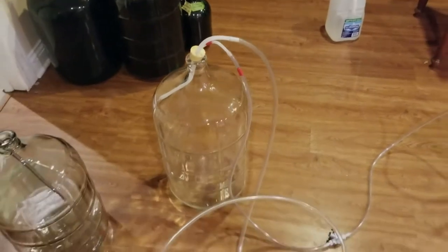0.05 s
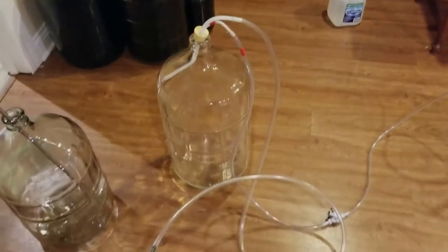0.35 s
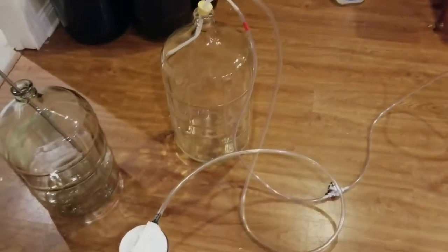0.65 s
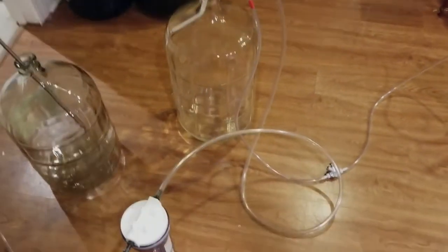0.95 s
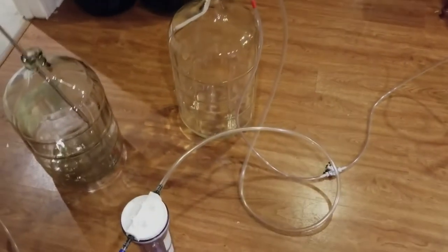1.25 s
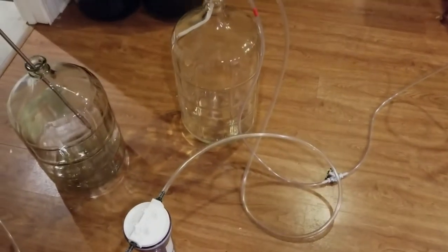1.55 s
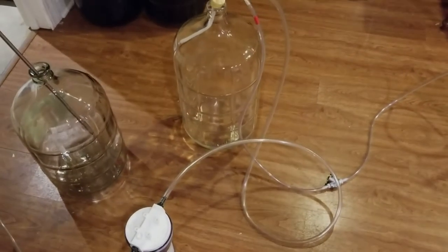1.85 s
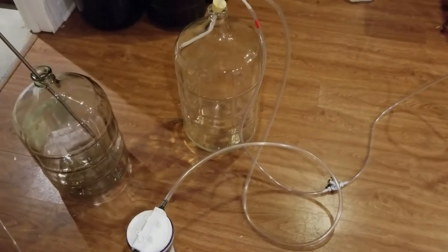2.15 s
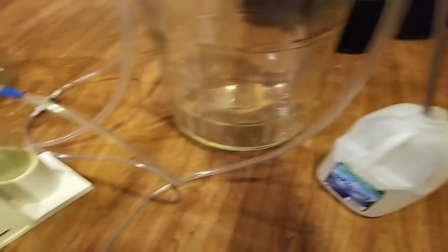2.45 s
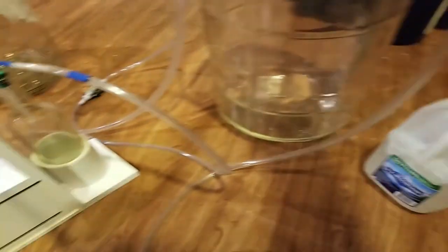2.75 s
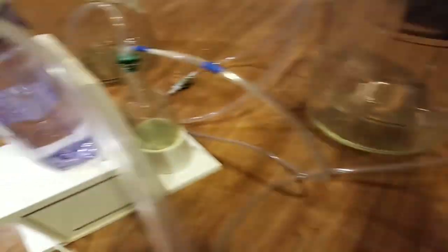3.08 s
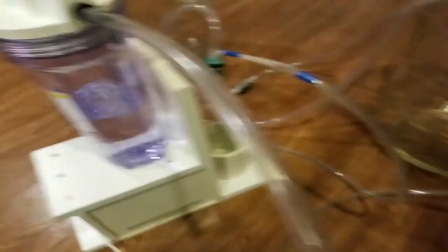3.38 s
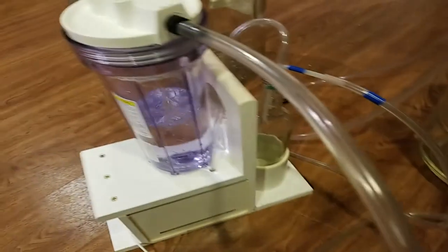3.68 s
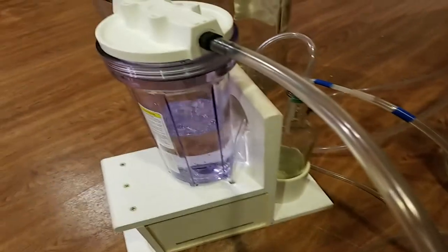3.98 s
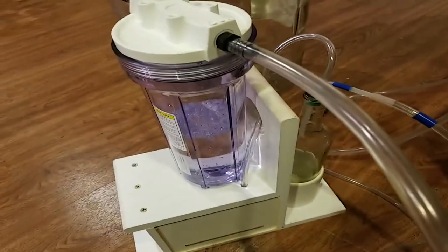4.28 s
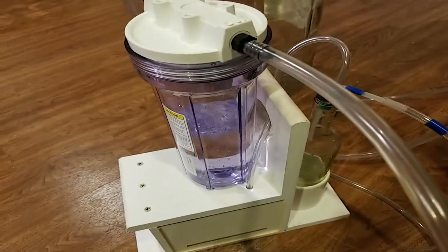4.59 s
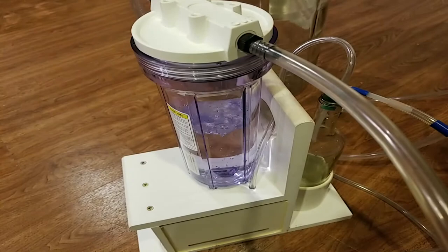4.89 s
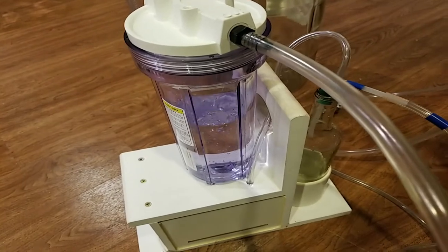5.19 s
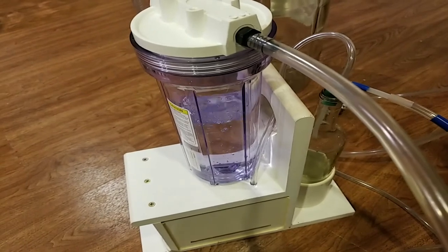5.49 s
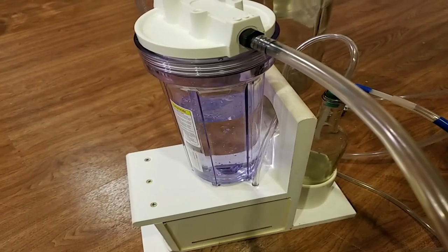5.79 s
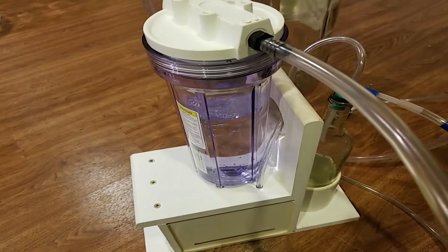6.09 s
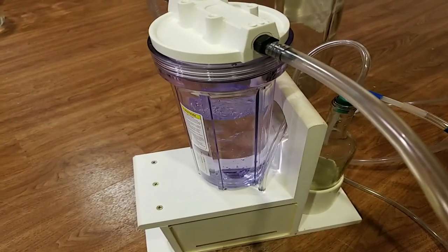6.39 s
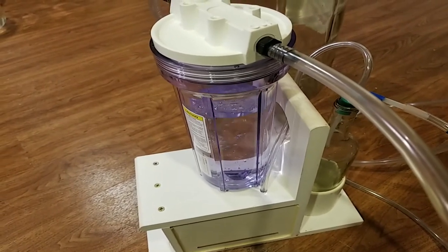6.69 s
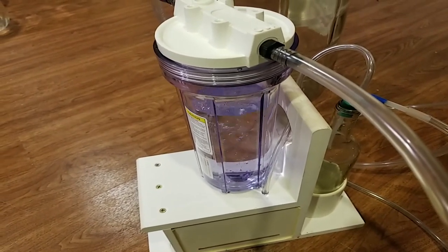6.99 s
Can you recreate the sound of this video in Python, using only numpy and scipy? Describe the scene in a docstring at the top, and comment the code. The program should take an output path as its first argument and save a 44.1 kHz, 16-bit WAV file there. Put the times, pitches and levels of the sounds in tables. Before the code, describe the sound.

Light clicks, pops and brief rustles come from fingers handling the microphone indoors, first on the left, then on the right. An abrupt cut brings in a much louder small vacuum pump, already running. It drones at an even speed with a fast buzzing knock, airy valve rattle and a thin high ring. The microphone nears it, and the sound settles, a little to the left.

```python
"""In a quiet room with a faint appliance hum, a hand shifts on a hand-held camera, and fingers tap
and slide over its two microphone ports. A short silence cuts to a second scene: a small diaphragm
vacuum pump at full speed. Each turn of its shaft knocks the body, spurts air through the rattling
valves and snaps a reed. The camera moves up to the pump, so the tone colour shifts and then settles;
later the hand shifts once more."""
import sys
import numpy as np
from scipy import signal
from scipy.fft import rfft, irfft, next_fast_len
from scipy.io import wavfile
from scipy.ndimage import map_coordinates

SR = 44100
rng = np.random.default_rng(int(sys.argv[2]) if len(sys.argv) > 2 else 0)


def file_out(sig):
    """Save sig as 16-bit WAV at sys.argv[1]."""
    # one column per channel
    cols = np.atleast_2d(sig).T
    # limit, then scale
    lim = np.clip(cols, -1, 1)
    pcm = np.round(lim * 32767).astype(np.int16)
    wavfile.write(sys.argv[1], SR, pcm)


N = 314874
TIME = np.arange(N) / SR
PAUSE_S, PUMP_S = 2.18, 2.2455  # the silence between the two scenes
TOP_HZ = 15850
PORT_PAN_DB = {"left": 24.5, "right": -22}  # a finger on one port is heard mostly on that side

# the pump's shaft speed: time_s, speed_hz
SHAFT_SPEED = [(2.25, 52.93), (2.8, 52.87), (3.25, 52.78), (5.5, 52.84), (5.8, 52.99), (6.0, 52.85),
               (7.14, 52.9)]
# air flow through the valves over one turn: place_in_turn (0-1), level_db
VALVE_FLOW = [(0, -4), (.08, -0.5), (.2, -5.5), (.4, -10.5), (.62, -5), (.76, -1.5), (.92, -4.5), (1, 6)]


def amp(db):
    """Decibels to gain."""
    return 10 ** (np.asarray(db) / 20)


def unit(x):
    """Scale to rms 1."""
    return x / np.sqrt(np.mean(x ** 2) + 1e-20)


def along(points, hz):
    """Read (freq_hz, value) points on a log axis."""
    freqs, values = np.transpose(points)
    return np.interp(np.log(hz + 1), np.log(freqs + 1), values)


def wobble(rate):
    """A smooth random curve, rate knots a second."""
    return map_coordinates(rng.standard_normal(int(N * rate / SR) + 4), [TIME * rate])


def filtered(x, response):
    """Filter x by a complex response of frequency."""
    size = next_fast_len(N + SR // 4)
    return irfft(rfft(x, size) * response(np.fft.rfftfreq(size, 1 / SR)), size)[..., :N]


def coloured(x, spectrum):
    """Shape x with a (freq_hz, gain_db) curve, at rms 1."""
    return unit(filtered(x, lambda hz: amp(along(spectrum, hz))))


def resonance(hz, centre_hz, width_hz):
    """Causal response of one mode."""
    return 1j * hz * width_hz / (centre_hz ** 2 - hz ** 2 + 1j * hz * width_hz)


def panned(pan_db):
    """Left and right gains whose mean is 1; positive is left."""
    ratio = amp(np.atleast_1d(pan_db))
    return 2 * np.array([ratio, np.ones_like(ratio)]) / (1 + ratio)


def each_turn(cycle, turn):
    """Play a stereo cycle once for every turn of the shaft."""
    size = cycle.shape[1]
    place = (turn % 1) * size
    index = place.astype(int)
    return cycle[:, index % size] * (index + 1 - place) + cycle[:, (index + 1) % size] * (place - index)


def room(apart_hz=1500):
    """Still air, alike at both ports in the bass; an appliance hums faintly during the first scene."""
    # room tone: freq_hz, gain_db
    air_colour = [(25, -5), (50, -0.5), (85, 4), (130, 4), (200, -13.5), (400, -17), (800, -23),
                  (2500, -25), (8000, -30.5), (15500, -27)]
    # the appliance's partials: pitch_hz, level_db
    partials = [(77, -67.5), (120, -72.5), (243, -81.5)]
    mid, side = coloured(rng.standard_normal((2, N)), air_colour)
    side = filtered(side, lambda hz: hz / (hz + apart_hz))
    hum = 0
    for hz, db in partials:
        level = np.sqrt(2) * amp(db + 1.5 * wobble(3.6))
        hum += level * np.sin(2 * np.pi * hz * TIME + .5 * wobble(5.45))
    return amp(-67.5) * np.array([mid + side, mid - side]) + hum * (TIME < PAUSE_S)


def shuffles():
    """The hand shifts its grip and the case rumbles briefly, through one broad resonance."""
    # shifts of the grip: centre_s, half_length_s, pitch_hz, level_db, pan_db
    grips = [(0.153, .13, 340, -65.5, 9), (0.334, 0.041, 188, -48, 23), (0.338, 0.048, 420, -54.5, 22),
             (0.728, 0.026, 420, -58.5, 21), (0.86, 0.11, 234, -64.5, 9), (2.074, 0.018, 735, -72, -20),
             (5.364, 0.074, 97, -50, 4)]
    out, noise = 0, rng.standard_normal(N)
    for centre_s, half_s, pitch_hz, db, pan_db in grips:
        rumble = unit(filtered(noise, lambda hz: resonance(hz, pitch_hz, .5 * pitch_hz) ** 2))
        out += panned(pan_db) * amp(db) * np.exp(-((TIME - centre_s) / half_s) ** 2) * rumble
    return out


def taps(thump_hz=135, thump_t60=0.022, pop_cycles=2.6, click_t60=0.0045, case_t60=0.043,
         port_hz=1950, port_t60=0.0033, dull_hz=750, bright_hz=8000, leak_hz=70):
    """A finger pushes air into a port: a click that rings it, a pop, a thump, a shiver of the case."""
    # finger contacts: start_s, level_db, thump_trim_db, click_trim_db, finger_part, port
    contacts = [(.292, -38, 3, -30, "pad", "left"), (.333, -40.5, 4, -22, "pad", "left"),
                (.458, -33.5, -20, -17.5, "pad", "left"), (.602, -38.5, -26, -30, "pad", "left"),
                (.762, -37, -6, -11, "pad", "right"), (.768, -23, -19, -17, "pad", "right"),
                (.826, -47, -7, -8.5, "pad", "right"), (.857, -45, -7, -19.5, "pad", "right"),
                (1.053, -44.5, -14, -15, "tip", "left"), (1.111, -28, -15, -12.5, "tip", "right"),
                (1.152, -33.5, -15, -11.5, "nail", "right"), (1.177, -44, -3, -20, "pad", "right"),
                (1.408, -39.5, -15, -34, "tip", "right"), (1.571, -42, -15, -28, "tip", "right"),
                (1.680, -34.5, -24, -32, "tip", "right"), (1.692, -31, -22, -34, "tip", "right"),
                (1.791, -49.5, -10, -36, "tip", "right"), (1.897, -35, -21, -41, "tip", "right"),
                (2.036, -35, -23, -46, "tip", "right"), (2.104, -57.5, 5.5, -30, "pad", "right")]
    pop_pitch_hz = {"pad": 300, "tip": 655, "nail": 1610}
    out, t = np.zeros((2, N)), np.arange(SR // 8) / SR
    for start_s, db, thump_db, click_db, part, port in contacts:
        pop_hz = pop_pitch_hz[part]
        pop = amp(1 - 60 * t * pop_hz / pop_cycles) * np.sin(2 * np.pi * pop_hz * t)
        thump = amp(9 + thump_db - 60 * t / thump_t60) * np.sin(2 * np.pi * thump_hz * t)
        # a hard contact brightens the click; a soft one rounds off the pop
        hardness = np.interp(click_db, [-38, -14], [0, 1])
        edge_hz = min(dull_hz * (bright_hz / dull_hz) ** hardness, TOP_HZ)
        pop = signal.lfilter(*signal.butter(1, min(2 * edge_hz, TOP_HZ), fs=SR), pop)
        grit = signal.lfilter(*signal.butter(2, edge_hz, fs=SR), rng.standard_normal(len(t)))
        click = amp(10 + click_db - 60 * t / click_t60) * unit(grit)
        ring = hardness * amp(14 + click_db - 60 * t / port_t60) * np.sin(2 * np.pi * port_hz * t)
        case = signal.lfilter(*signal.butter(2, [500, 1500], "band", fs=SR), rng.standard_normal(len(t)))
        shiver = amp(-24 - 60 * t / case_t60) * unit(case)
        tap = amp(db) * (pop + thump + click + ring + shiver)
        out[:, round(start_s * SR):][:, :len(t)] += panned(PORT_PAN_DB[port]) * tap
    # the port leaks, so the slowest pressure is lost
    return signal.lfilter(*signal.butter(2, leak_hz, "high", fs=SR), out)


def strokes(grain_db=1.2, attack_s=0.03, release_s=0.039, fizz_arch_db=4):
    """Skin slides in fine, uneven slips over one port; it fizzes most mid-stroke, where it is fastest."""
    # finger slides: start_s, length_s, level_db, pressure_change_db, fizz_re_rub_db, rub_kind
    slides = [(0.331, 0.055, -51.5, -2.5, -8, "swipe"), (0.472, .170, -56.5, -3.5, 0.5, "left"),
              (0.686, 0.051, -64, -3, -20, "left"), (0.846, 0.021, -68, -2, -2, "right"),
              (1.116, 0.063, -66, 4, 2, "right"), (1.183, 0.14, -54.5, 3, -10.5, "right"),
              (1.438, 0.037, -54, -0.5, -19.5, "right"), (1.603, 0.06, -56.5, -1.5, -30, "right")]
    # skin in a quick swipe, on the left port, on the right port, and its fizz: freq_hz, gain_db
    swipe_colour = [(100, -8), (300, 16.5), (600, 3), (1100, -4), (2200, -4), (3200, -1), (4600, 0.5),
                    (6300, -6.5), (9000, -20)]
    left_colour = [(100, 9.5), (300, 10), (600, 4), (1100, 5), (2200, 3), (3200, -1), (4800, -1),
                   (6500, -15), (9000, -22)]
    right_colour = [(100, 3), (400, -1.5), (700, 5.5), (1150, -1), (1700, -0.5), (2200, -5), (2800, 3),
                    (3600, -1.5), (4600, -12), (6500, -14), (9000, -46)]
    fizz_colour = [(4000, -12), (6500, 0), (8500, -5), (11000, -1), (14000, -3), (16000, 1)]
    slips = amp(grain_db * wobble(700)) * rng.standard_normal((2, N))
    fizz = coloured(slips, fizz_colour)
    rubs = {"swipe": (coloured(slips, swipe_colour), "left"),
            "left": (coloured(slips, left_colour), "left"),
            "right": (coloured(slips, right_colour), "right")}
    out = 0
    for start, length, db, pressure_db, fizz_db, kind in slides:
        rub, port = rubs[kind]
        progress = np.clip((TIME - start) / length, 0, 1)
        fade_in_db = 20 * np.maximum(start - TIME, 0) / attack_s
        fade_out_db = 20 * np.maximum(TIME - start - length, 0) / release_s
        level = amp(db + pressure_db * (progress - .5) - fade_in_db - fade_out_db)
        fizz_share = amp(fizz_db + fizz_arch_db * (np.sin(np.pi * progress) - 1))
        out += panned(PORT_PAN_DB[port]) * level * (rub + fizz_share * fizz)
    return out


def pump_body(turn, near, levels_db, far_scatter=0.6, near_scatter=0.34, motor_order=4):
    """Each turn's blows ring the body; reflections scatter the harmonics' phases, more so from afar."""
    # the shaft's harmonics from afar and close by: order, relative_db
    far_harmonics = [(1, -11), (2, -9.5), (3, -7.5), (4, 2), (5, -7), (6, -7.5), (7, -13.5), (8, -2),
                     (9, -10.5), (10, -14), (11, -8), (12, -22), (13, -23), (14, -21), (15, -32), (16, -17),
                     (17, -28), (18, -12), (19, -9.5), (20, -13.5), (21, -2.5), (22, -7.5), (23, -6),
                     (24, -7.5), (25, -27), (26, -6), (27, -21), (28, -23), (29, -4), (30, -4.5), (31, -6),
                     (32, -11.5), (33, -38), (34, -7.5), (35, -17), (36, -26)]
    near_harmonics = [(1, -11), (2, -8.5), (3, -7.5), (4, 1), (5, -6), (6, -15.5), (7, -36), (8, -5.5),
                      (9, 0.5), (10, -4.5), (11, -7), (12, -16), (13, -28.5), (14, -26.5), (15, -25.5),
                      (16, -33), (17, -14.5), (18, -17), (19, -9), (20, -34), (21, -10), (22, -27),
                      (23, -10.5), (24, -11.5), (25, -11.5), (26, -15), (27, -3.5), (28, -7.5), (29, -4),
                      (30, -5.5), (31, -6.5), (32, -4.5), (33, -9), (34, -9), (35, -16), (36, -16)]
    # blows that set the harmonics' phases: place_in_turn (0-1), pitch_hz, width_hz, weight_db
    blows = [(0.05, 1670, 430, 9), (.69, 554, 38, 3.5), (.72, 235, 280, 6), (.05, 1060, 66, -2.5)]
    order = np.transpose(far_harmonics)[0]
    hz = order * np.mean(np.transpose(SHAFT_SPEED)[1])
    response = sum(amp(db) * resonance(hz, pitch, width) * np.exp(-2j * np.pi * order * place)
                   for place, pitch, width, db in blows)
    stray = rng.standard_normal(len(hz))
    # the motor's own hum is out of step with the blows and fills the gaps between them
    motor_lag = np.pi / 2 * (order == motor_order)
    # the shorter the wave, the more it differs between the two ports
    apart = 0.49 * np.minimum(np.sqrt(hz / 1500), 1) * rng.choice([-1, 1], size=len(hz))
    cycle = 2 * np.pi * order[:, None] * np.linspace(0, 1, 2048, endpoint=False)
    band_of = np.digitize(hz, [800, 1350])  # low drone, chamber buzz, knock
    gains = [amp(db + 0.08 * wobble(25)) for db in levels_db]
    chamber = np.abs(resonance(hz, centre_hz=1135, width_hz=110)) ** 2
    swell = amp(beam(centre_s=3.1, half_s=.45, db=8)) - 1
    out = 0
    # the room's colour gives way to the pump's own as the camera nears
    views = (far_harmonics, 1 - near, far_scatter), (near_harmonics, near, near_scatter)
    for harmonics, share, scatter in views:
        phase = np.angle(response) + scatter * stray - motor_lag
        port_phases = np.array([phase + apart, phase - apart])
        waves = np.cos(cycle + port_phases[..., None]) / np.cos(apart)[:, None]
        for band, gain in enumerate(gains):
            sizes = (band_of == band) * amp(np.transpose(harmonics)[1])
            sizes /= np.sqrt(np.sum(sizes ** 2) / 2)
            sound = each_turn(sizes @ waves, turn)
            if band == 1:  # in its beam, the buzz swells around the chamber's resonance
                sound += swell * each_turn((chamber * sizes) @ waves, turn)
            out += share * gain * sound
    return out


def valves(turn, near, level_db, air_db=3, rattle_db=-1):
    """Air spurts through the valves twice a turn; their rattle repeats and rings the housing."""
    # turbulent air and valve rattle: freq_hz, gain_db
    hiss_colour = [(25, -20), (130, 7), (330, 5.5), (500, 13), (750, -2), (1000, 11), (1650, 11.5),
                   (2000, -1.5), (3600, 3), (4300, -2.5), (6300, -4.5), (9000, -6.5), (11500, -7.5),
                   (14500, -26.5)]
    rattle_colour = [(1700, -54), (1950, 3), (2300, 6), (2700, -0.5), (3100, -1), (3550, 3), (4200, -10.5),
                     (5200, 1), (6200, -5.5), (7000, -7), (9000, -37), (13000, -9), (16000, -8.5)]
    # modes of the housing: pitch_hz, width_hz, far_db, near_db
    housing_modes = [(2130, 340, -73, -56.5), (2650, 170, -81, -63), (3550, 260, -61, -66),
                     (7880, 160, -57, -65.5), (11280, 800, -59, -60), (15430, 320, -62, -56.5)]
    flow = amp(np.interp(turn % 1, *np.transpose(VALVE_FLOW)))
    air = unit(flow * rng.standard_normal((2, N)))
    # the rattle drifts slowly between two patterns, most of all while the camera moves
    drift = 3.23 * near + 0.12 * wobble(1.53)
    patterns = signal.resample(rng.standard_normal((2, 2, 834)), 4096, axis=-1)
    first, second = (each_turn(pattern, turn) for pattern in patterns)
    rattle = unit(flow ** 0.63 * (np.cos(drift) * first + np.sin(drift) * second))
    out = amp(level_db + air_db) * coloured(air, hiss_colour)
    out += amp(level_db + rattle_db) * coloured(rattle, rattle_colour)
    # the housing is shaken mostly at the peak of the flow
    shake = np.sqrt(flow) * (air + 0.99 * rattle)
    for pitch_hz, width_hz, far_db, near_db in housing_modes:
        ring = unit(filtered(shake, lambda hz: resonance(hz, pitch_hz, width_hz)))
        out += amp(far_db + near * (near_db - far_db)) * ring
    return out


def reed(turn, level_db, pitch_hz=5610, width_hz=185, head_width_hz=700, place_in_turn=0.0586,
         jitter_s=.000016, flutter_db=-6):
    """A valve reed snaps shut once a turn, never quite alike, and rings briefly."""
    snap_turns = np.arange(np.ceil(turn[0]), np.floor(turn[-1])) + place_in_turn
    late, size_db = rng.standard_normal((len(snap_turns), 2)).T
    snap_s = np.interp(snap_turns, turn, TIME) + jitter_s * late
    snap_samples = np.clip(np.round(snap_s * SR).astype(int), 0, N - 1)
    snaps = np.bincount(snap_samples, amp(size_db), N)
    # it reaches the right port a quarter of a cycle later
    snaps = np.array([snaps, np.roll(snaps, round(SR / pitch_hz / 4))])
    flow = amp(np.interp(turn % 1, *np.transpose(VALVE_FLOW)))
    drive = unit(snaps) + amp(flutter_db) * unit(flow * rng.standard_normal((2, N)))
    # the ring passes through the pump head, which softens its attack
    ring = filtered(drive, lambda hz: resonance(hz, pitch_hz, width_hz)
                    * resonance(hz, pitch_hz, head_width_hz))
    return amp(level_db) * unit(ring)


def beam(centre_s, half_s, db):
    """The pump radiates unevenly: the lift in dB as the camera crosses a beam of its sound."""
    return db * np.exp(-((TIME - centre_s) / half_s) ** 2)


def pump(first_knock_s=2.2618, knock_db_per_hz=9, knock_db_per_s=.4):
    """One shaft drives body, valves and reed; their levels grow as the camera nears."""
    # the camera's move: time_s, nearness (0-1)
    approach = [(2.45, 0), (3.0, 0.32), (3.3, 0.63), (3.85, 0.84)]
    # the pump stands to the left: freq_hz, pan_db
    pan_curve = [(60, 5), (110, 4.5), (200, 3.5), (380, 5), (700, 10.5), (1290, 5), (2380, 6), (4400, 3.5),
                 (8120, 9.5), (15000, 14.5)]
    speed = np.interp(TIME, *np.transpose(SHAFT_SPEED))
    near = np.interp(TIME, *np.transpose(approach))
    drone_db, buzz_db, valve_db = -40 + 2 * near, -46 + near, -48.5 + 0.5 * near
    # the knock hardens as the shaft speeds up, and grows slowly as the pump runs on
    knock_db = -46.3 + 4.7 * near + knock_db_per_hz * (speed - speed.mean())
    knock_db += knock_db_per_s * (TIME - PUMP_S)
    reed_db = -55.5 + 3 * near + beam(centre_s=2.77, half_s=0.31, db=8.5) + 0.5 * wobble(2.98)
    turn = np.cumsum(speed) / SR
    turn = turn - np.interp(first_knock_s, TIME, turn) + 0.00033 * wobble(40)
    body = pump_body(turn, near, (drone_db, buzz_db, knock_db))
    sound = body + valves(turn, near, valve_db) + reed(turn, reed_db)
    return filtered(sound, lambda hz: panned(along(pan_curve, hz))) * (TIME > PUMP_S)


def scene():
    """Over the room tone: handling first, then the pump."""
    return room() + strokes() + taps() + shuffles() + pump()


def record(dry, fade_s=.001):
    """The camera is silent between the two scenes and keeps nothing above its band limit."""
    live = np.clip(np.maximum(PAUSE_S - TIME, TIME - PUMP_S) / fade_s, 0, 1)
    return filtered(dry * live, lambda hz: hz < TOP_HZ)


dry = scene()
out = record(dry)
file_out(out)
```